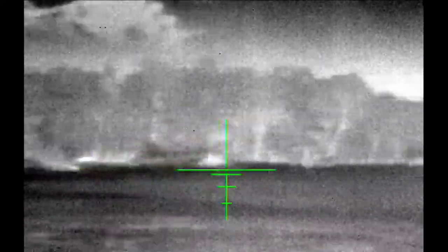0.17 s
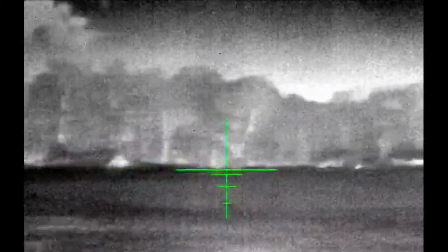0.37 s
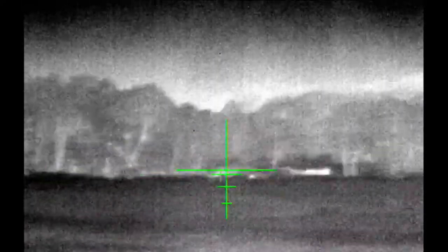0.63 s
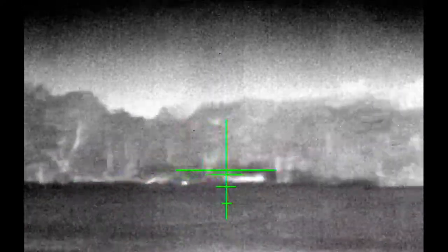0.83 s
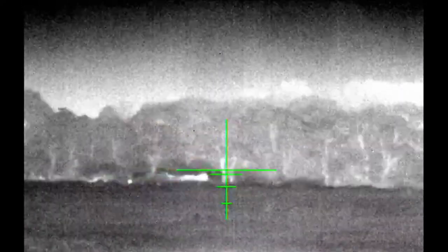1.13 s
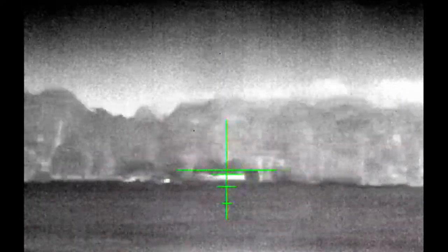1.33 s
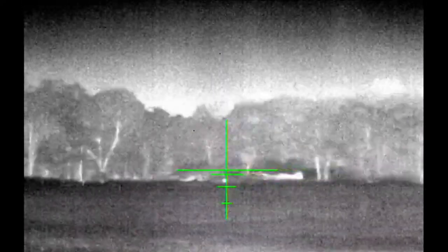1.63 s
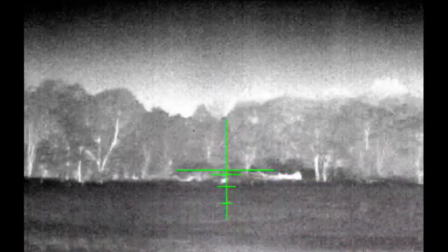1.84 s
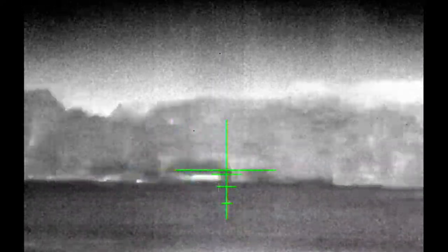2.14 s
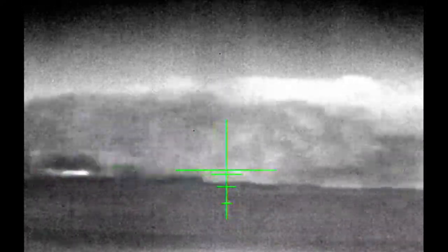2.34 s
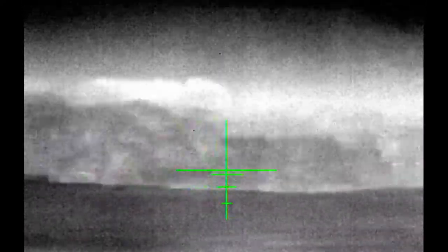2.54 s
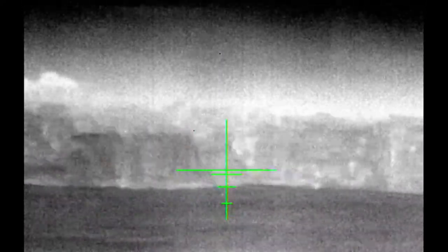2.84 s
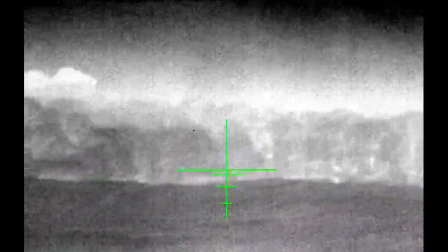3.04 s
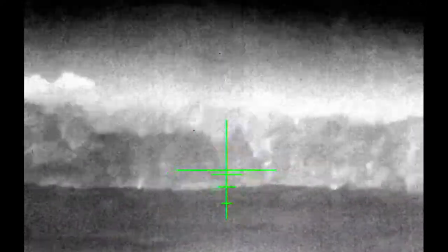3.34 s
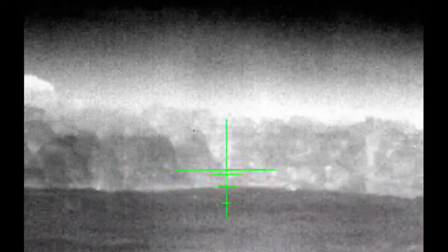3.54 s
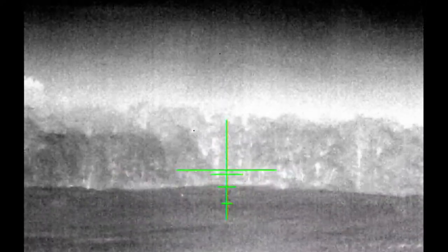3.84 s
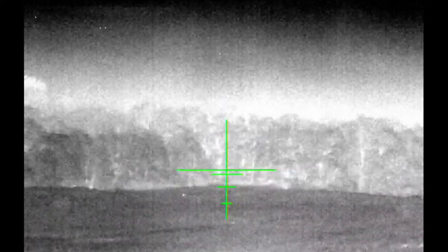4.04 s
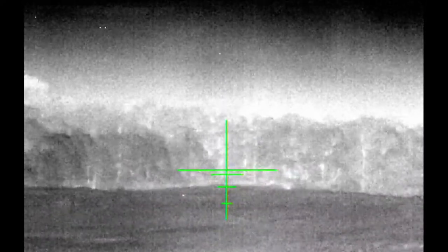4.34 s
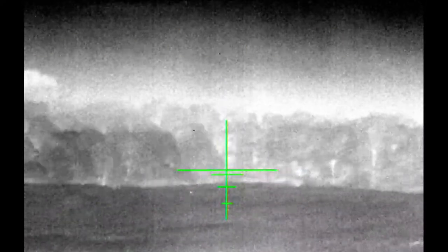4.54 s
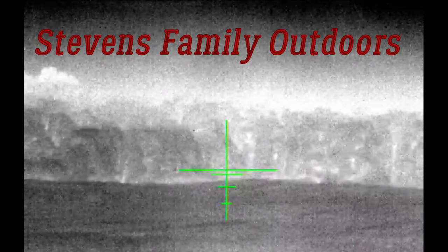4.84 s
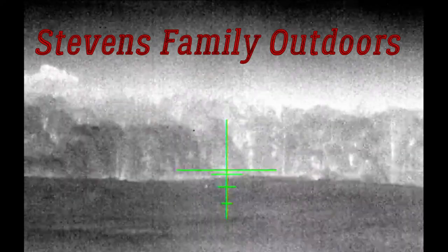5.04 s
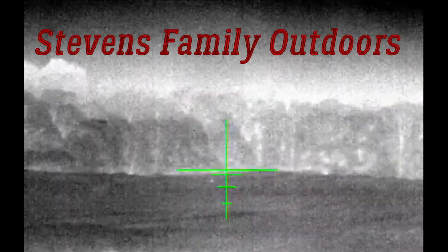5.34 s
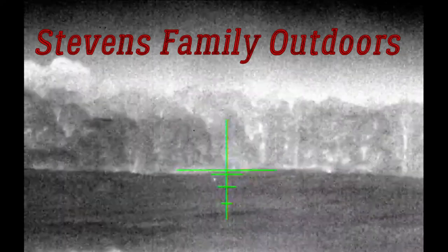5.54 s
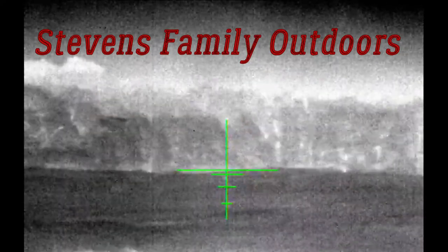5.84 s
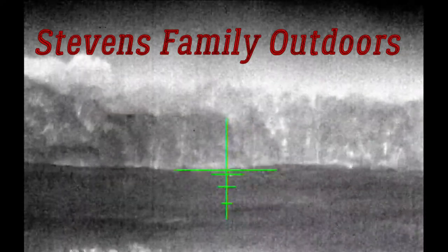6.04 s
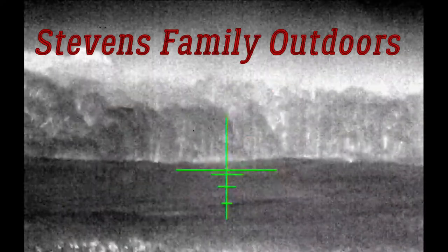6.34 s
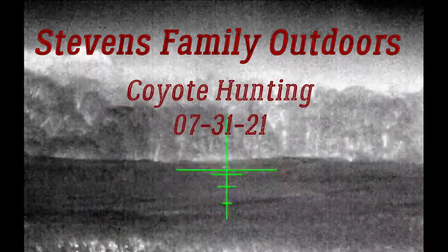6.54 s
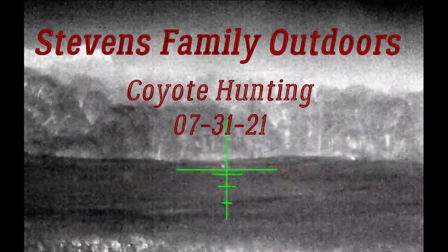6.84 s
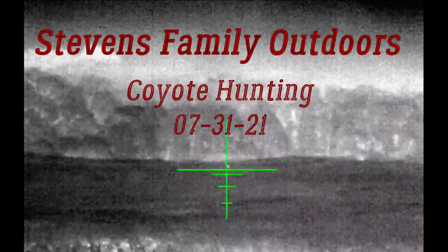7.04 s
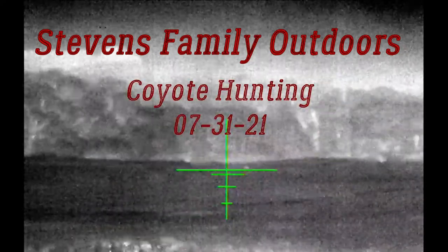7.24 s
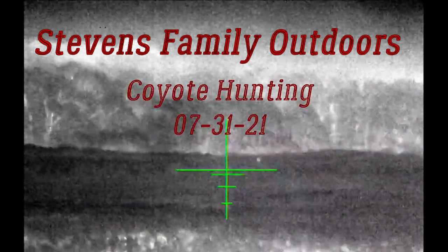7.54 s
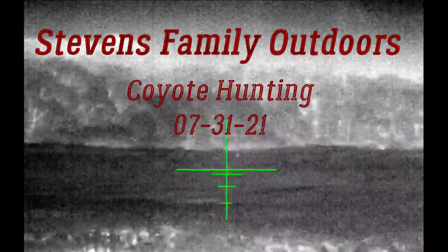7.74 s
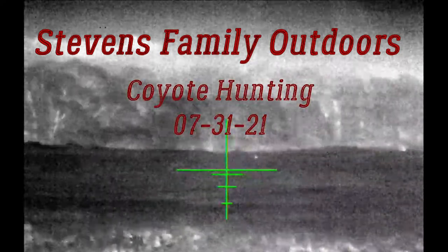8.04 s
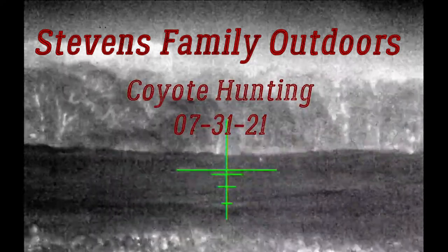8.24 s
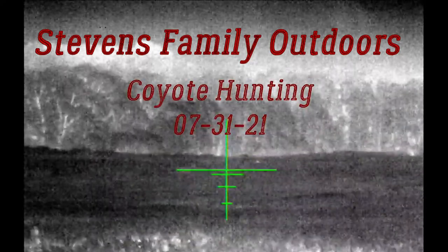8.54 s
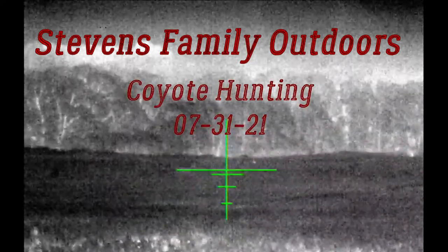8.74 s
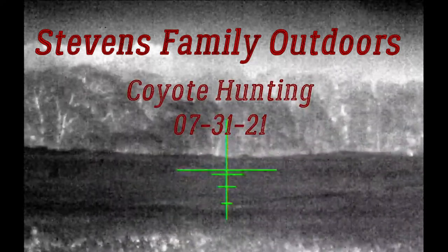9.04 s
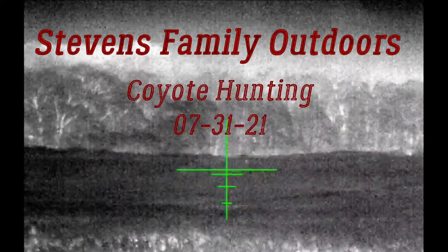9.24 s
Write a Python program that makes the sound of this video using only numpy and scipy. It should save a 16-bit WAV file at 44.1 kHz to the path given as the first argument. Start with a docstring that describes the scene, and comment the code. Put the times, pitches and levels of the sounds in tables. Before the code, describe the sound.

Distant coyotes yip across a night field while one close cricket chirps rhythmically above a high katydid buzz and pulsing insect hiss.

```python
"""A field at night: one near cricket chirps by scraping its wings, and a katydid buzzes on and off.
Coyotes yip far away, and something ticks once close by. Behind them a chorus of far insects
hisses over a low drone, a faint hum and a fading motor. The microphone is mono; its automatic
volume control drops at every chirp and climbs back, so the whole chorus pumps."""
import sys
import numpy as np
from scipy import signal
from scipy.fft import rfft, irfft
from scipy.io import wavfile
from scipy.ndimage import uniform_filter1d

SR = 44100
rng = np.random.default_rng(int(sys.argv[2]) if len(sys.argv) > 2 else 0)


def pcm_store(signal):
    """Save signal as 16-bit PCM."""
    levels = np.round(np.clip(np.atleast_2d(signal), -1, 1) * 32767)
    wavfile.write(sys.argv[1], SR, levels.astype(np.int16).T)


N = 414848

# Each chirp is a soft lead-in and three full wing strokes, timed at their peaks:
# lead_in_s, first_s, second_s, third_s, lead_in_db, strokes_db
CHIRPS = [(-.13, -.095, -.045, .0086, -40, -18), (.26, .294, .3456, .4011, -42, -16.5),
          (.7987, .8404, .8982, .9435, -37, -18.5), (1.1977, 1.238, 1.2866, 1.337, -32, -16.5),
          (1.7367, 1.765, 1.817, 1.873, -27.5, -15.5), (2.1661, 2.197, 2.2446, 2.3004, -28, -14.5),
          (2.589, 2.617, 2.6682, 2.729, -31, -13), (3.0005, 3.0423, 3.0889, 3.1403, -31, -12.1),
          (3.419, 3.46, 3.5087, 3.561, -27.5, -11.5), (3.92, 3.951, 3.997, 4.0546, -32, -10.6),
          (4.4066, 4.439, 4.491, 4.5473, -33, -9.7), (4.8377, 4.874, 4.9039, 4.957, -34.5, -9.8),
          (5.275, 5.309, 5.3578, 5.409, -31.5, -9.7), (5.676, 5.7003, 5.759, 5.8143, -31, -11.5),
          (6.0867, 6.1225, 6.1714, 6.225, -32.5, -14.5), (6.4766, 6.5105, 6.5589, 6.6124, -30, -10.2),
          (6.968, 7.0108, 7.061, 7.1129, -36, -11), (7.3955, 7.425, 7.4759, 7.5286, -31, -9.2),
          (7.8395, 7.8748, 7.9225, 7.9743, -31, -10.8), (8.2575, 8.2996, 8.35, 8.4063, -30, -10.4),
          (8.7424, 8.7953, 8.8444, 8.8959, -33, -10.8), (9.233, 9.2787, 9.326, 9.3812, -32.5, -11.8)]
# The four strokes: pitch_hz, peak_db (added to the chirp's), hump_db, drag_db (both added to the peak's)
STROKES = [(4290, -3, 0, -1), (4450, -.3, -5, 0), (4445, .2, -6, .5), (4452, -.1, -7, 1)]
# How much a stroke varies by chance: pitch_hz, peak_db, hump_db, drag_db
STROKE_SPREAD = (12, .5, 2, 1)
# A full stroke's dragging end is heard more while the microphone points away: time_s, change_db
DRAG_LEVELS = [(0, -4), (1, -2), (2.3, -3), (3.2, -6), (3.9, -14), (9.41, -17)]
# Single echoes of the cricket: delay_s, level_db
ECHOES = [(0.034, -12), (.086, -15.5)]


def cricket():
    """Each wing stroke rings a pure, sinking tone: a sharp peak, a second hump, a dragging end."""
    t = np.arange(-.02, .05, 1 / SR)  # seconds from the peak
    peak = np.exp(-(t / np.where(t < 0, .0034, .003)) ** 2)
    peak += gain_of(-15) * np.exp(-((t + .007) / .005) ** 2)  # a soft start
    hump = np.exp(-((t - .0085) / .0055) ** 2)
    drag_shape = np.exp(-((t + .004) / np.where(t < -.004, .009, .022)) ** 2)
    late = np.maximum(t, 0)
    chirps = np.array(CHIRPS)
    peak_times = chirps[:, :4]
    strokes = STROKES + STROKE_SPREAD * rng.standard_normal((len(chirps), 4, 4))
    strokes[:, 0, 1] += chirps[:, -2]  # lead-in level
    strokes[:, 1:, 1] += chirps[:, -1:]  # full stroke level
    strokes[:, 1:, -1] += np.interp(peak_times[:, 1:], *np.transpose(DRAG_LEVELS))
    heard = peak_times > -t[-1]
    direct, drag = np.zeros((2, N))
    for peak_s, (hz, db, hump_db, drag_db) in zip(peak_times[heard], strokes[heard]):
        tone = np.cos(2 * np.pi * (hz * t - 1300 * late ** 2))  # the wing's teeth pass ever more slowly
        drag_tone = np.cos(2 * np.pi * ((hz + 60) * t - 3600 * (t + .012) ** 2))
        add(direct, peak_s + t[0], gain_of(db) * (peak + gain_of(hump_db) * hump) * tone)
        add(drag, peak_s + t[0], gain_of(db + drag_db) * drag_shape * drag_tone)
    scrape = abs(drag) * rng.standard_normal(N)  # uneven teeth add a rasp just below the tone
    drag += gain_of(9) * resonate_twice(scrape, hz=4200, width_hz=320)
    near = direct + scatter(drag, fade_s=.18, build_s=.001)
    echoes = sum(gain_of(db) * np.pad(direct, (round(delay_s * SR), 0))[:N] for delay_s, db in ECHOES)
    return near + echoes + gain_of(-12) * scatter(direct, fade_s=.45, build_s=.015)


# When the katydid buzzes: start_s, end_s, level_db
BUZZES = [(-.8, 1.03, -50.5), (1.5, 3.76, -50.5), (4.1, 6.42, -50), (6.78, 9.1, -50.5)]
# Where its wings ring: pitch_hz, width_hz, level_db
WING_RINGS = [(8050, 730, -10), (9470, 1500, 11), (11000, 800, 2)]


def katydid():
    """Rapid tooth clicks ring the wings; each throbbing buzz swells from near silence and breaks off."""
    t = np.arange(N) / SR
    swell_s, stop_s, quiet_db = .6, .22, -28
    level = np.zeros(N)
    for start_s, end_s, db in BUZZES:
        fade_in = np.maximum(1 - (t - start_s) / swell_s, 0) ** 2
        fade_out = (t - end_s) / stop_s
        level += gain_of(db + quiet_db * np.clip(np.maximum(fade_in, fade_out), 0, 1.2))
    clicks = rng.standard_normal((len(WING_RINGS), N)) * gain_of(2 * wander(300) + 1.2 * wander(14))
    wings = sum(gain_of(db) * resonate_twice(drive, hz, width_hz)
                for drive, (hz, width_hz, db) in zip(clicks, WING_RINGS))
    return level * evened(wings)


# One gliding tone of a yip per row; a fraction runs from 0 to 1 along the yip:
# start_s, length_s, first_hz, turn_hz, last_hz, turn_fraction, loudest_fraction, level_db
YIPS = [(.38, .05, 1890, 1880, 1520, .1, .45, -46), (1.49, .05, 1470, 1620, 1668, .8, .6, -45),
        (1.61, .04, 1552, 1650, 1566, .45, .45, -44), (1.89, .03, 1810, 1800, 1394, .05, .4, -38),
        (2.778, .032, 1800, 1790, 1461, .05, .3, -40), (2.94, .13, 1464, 1970, 1440, .62, .9, -44),
        (3.295, .035, 1850, 1840, 1280, .05, .5, -33), (3.47, .05, 1285, 1580, 1600, .8, .4, -37),
        (3.775, .178, 1200, 1850, 1280, .46, .55, -23.5), (4.14, .25, 1700, 1960, 1860, .2, .3, -32),
        (4.197, .042, 1890, 1870, 1300, .05, .15, -22), (4.6, .27, 1090, 1120, 1105, .6, .5, -52),
        (5.23, .06, 1694, 1744, 1630, .4, .5, -48), (7.155, .13, 2500, 2750, 2720, .4, .15, -44),
        (7.165, .1, 3400, 3420, 3400, .3, .15, -45), (8.09, .15, 1740, 1760, 1750, .25, .2, -41),
        (8.47, .06, 1300, 1390, 1400, .35, .35, -44), (8.53, .062, 1400, 1800, 1850, .85, .7, -40),
        (8.76, .16, 1200, 1310, 1280, .3, .15, -50), (9.16, .125, 1405, 1590, 1540, .25, .4, -35),
        (9.165, .115, 2150, 2370, 2250, .25, .35, -37)]


def coyotes():
    """Slightly hoarse calls, most arching up and then down, smeared by the long way over the field."""
    calls = np.zeros(N)
    pitch_shake, flutter = 1 + .011 * wander(250), gain_of(3 * wander(120))
    for start_s, length_s, first_hz, turn_hz, last_hz, turn, loudest, db in YIPS:
        progress = np.arange(0, length_s, 1 / SR) / length_s
        before = np.maximum(1 - progress / turn, 0)
        after = np.maximum((progress - turn) / (1 - turn), 0)
        hz = turn_hz + (first_hz - turn_hz) * before ** 2 + (last_hz - turn_hz) * after ** 1.3
        at = round(start_s * SR) + np.arange(len(progress))
        tone = np.sqrt(2) * flutter[at] * np.sin(2 * np.pi * np.cumsum(hz * pitch_shake[at]) / SR)
        level = gain_of(db + np.interp(progress, [0, loudest, 1], [-11, 0, -19]))
        add(calls, start_s, level * tone * signal.windows.tukey(len(tone), .15))
    return calls + gain_of(-4.5) * scatter(calls, fade_s=.46, build_s=.026)


# The tones inside the tick: pitch_hz, level_db, fade_s (time to drop 60 dB)
TICK_TONES = [(900, -10, 0.0077), (2570, -1, 0.0033), (4700, 4.5, 0.0069), (6400, 21, 0.0013),
              (11000, -9, 0.0034)]


def tick(start_s=6.1913):
    """One hard knock near the microphone: a few tones that die at once, with no bass."""
    knock, t = np.zeros(N), np.arange(900) / SR
    ring = sum(gain_of(db - 60 * t / fade_s) * np.sin(2 * np.pi * hz * t)
               for hz, db, fade_s in TICK_TONES)
    onset = 1 - np.exp(-(t / .0006) ** 2)
    add(knock, start_s, gain_of(2.2) * ring * onset)
    knock += gain_of(-14) * scatter(knock, fade_s=.03, build_s=.002)
    return signal.lfilter(*signal.butter(2, 350, "high", fs=SR), knock)


# How the far insects and night air spread from low to high: pitch_hz, level_db
CHORUS_COLOUR = [(24, -75), (40, -50), (146, -36), (178, -23.5), (386, -11), (471, -7), (1370, -13),
                 (1480, -15), (2100, -10.5), (2630, -12.5), (4110, -11), (5540, 1.5), (6770, -6.5),
                 (8900, -25), (15400, -45)]
# Far groups of trilling insects: pitch_hz, width_hz, level_db
TRILLS = [(2067, 110, -53.5), (2823, 71, -57), (4197, 300, -48), (4497, 180, -46)]


def insect_chorus():
    """Countless far insects blur into a hiss with drifting patches; a few groups trill on one pitch each."""
    real, imaginary, patches = rng.standard_normal((N // 128 + 5, 257, 3)).T  # grids of pitch by time
    patches = evened(uniform_filter1d(uniform_filter1d(patches, 6, axis=0), 8, axis=1))
    hiss = signal.istft((real + 1j * imaginary) * gain_of(1.3 * patches), nperseg=512, noverlap=384)[1]
    pitches, levels = np.transpose(CHORUS_COLOUR)
    colour = gain_of(np.interp(np.log(np.fft.rfftfreq(N, 1 / SR) + 1), np.log(pitches + 1), levels))
    chorus = gain_of(-36.5) * evened(irfft(rfft(hiss[:N]) * colour, N))
    for hz, width_hz, db in TRILLS:
        pulses = rng.standard_normal(N) * gain_of(2.6 * wander(40))  # they fall in and out of step
        chorus += gain_of(db) * evened(resonate_twice(pulses, hz, width_hz))
    return chorus


# How loud the drone is: time_s, level_db
DRONE_LEVELS = [(0, -54), (2.1, -55.5), (3.4, -57), (3.8, -50), (4.3, -57), (4.8, -49.5), (5.2, -55),
                (6, -52), (6.9, -57), (7.5, -52), (9.41, -47.5)]


def drone():
    """A low, fuzzy tone that wavers in pitch as it swells and fades."""
    return level_curve(DRONE_LEVELS) * fuzzy_tone(hz=620 + 5 * wander(2), width_hz=38)


# How loud the motor is: time_s, level_db
MOTOR_LEVELS = [(0, -52.5), (.8, -51.5), (1.599, -61), (2.4, -62), (4, -69), (9.41, -65)]
# The motor's tones: pitch_hz, width_hz, level_db (added to the motor's)
MOTOR_TONES = [(150.2, 25, -16), (221.7, 14, -10.5), (425, 14, -10.5), (503, 33, -3)]


def motor():
    """A far motor: fuzzy low tones that fade together."""
    tones = sum(gain_of(db) * fuzzy_tone(hz, width_hz) for hz, width_hz, db in MOTOR_TONES)
    return level_curve(MOTOR_LEVELS) * tones


# The tones of the hum: pitch_hz, level_db
HUM_TONES = [(120, -79.5), (180, -72), (240, -70.5), (300, -66.5)]


def hum():
    """Faint low tones that hold their pitch."""
    return sum(gain_of(db) * evened(resonate(rng.standard_normal(N), hz, width_hz=2.2))
               for hz, db in HUM_TONES)


def scatter(sound, fade_s, build_s):
    """Grass and trees send back many tiny echoes that build up, then die away by 60 dB in fade_s."""
    echoes, t = np.zeros(SR), np.arange(SR) / SR
    slots = np.arange(0, SR - 20, 20)
    echoes[slots + rng.integers(0, 20, len(slots))] = rng.choice([-1., 1.], len(slots))
    echoes *= gain_of(-60 * t / fade_s) * np.clip(t / build_s, 0, 1) ** 2
    return signal.fftconvolve(sound, echoes / np.linalg.norm(echoes))[:N]


def resonate(sound, hz, width_hz):
    """Keeps the sound near one pitch: shifts that pitch down to zero, smooths, and shifts back."""
    spin = np.exp(2j * np.pi * np.cumsum(hz * np.ones(len(sound))) / SR)
    decay = np.exp(-np.pi * width_hz / SR)
    return 2 * (spin * signal.lfilter([1 - decay], [1, -decay], sound / spin)).real


def resonate_twice(sound, hz, width_hz):
    """Two passes let less through away from the pitch."""
    return resonate(resonate(sound, hz, width_hz), hz, width_hz)


def fuzzy_tone(hz, width_hz):
    """Noise narrowed until it has a pitch."""
    return evened(resonate_twice(rng.standard_normal(N), hz, width_hz))


def wander(per_s):
    """A random wobble of size about 1 that turns per_s times a second."""
    points = rng.standard_normal(3000)
    return np.interp(np.arange(N) / SR * per_s, np.arange(len(points)), points) * np.sqrt(3 / 2)


def level_curve(rows):
    """Joins rows of time_s, level_db into a gain for every sample."""
    return gain_of(np.interp(np.arange(N) / SR, *np.transpose(rows)))


def gain_of(db):
    """Turns decibels into a number to multiply by."""
    return 10 ** (np.asarray(db) / 20)


def evened(sound):
    """Scales a sound to an average power of 1."""
    return sound / np.sqrt(np.mean(sound ** 2) + 1e-20)


def add(mix, start_s, sound):
    """Mixes a sound in at start_s."""
    at = round(start_s * SR)
    part = mix[max(at, 0):][:len(sound) + min(at, 0)]
    part += sound[max(-at, 0):][:len(part)]


def scene():
    """Everything reaches one microphone, so left and right are the same."""
    mono = cricket() + insect_chorus() + katydid() + coyotes() + drone() + hum() + motor() + tick()
    return np.array([mono, mono])


def record(dry):
    """The volume control turns loud sounds down fast and recovers slowly; the highest treble is cut."""
    ceiling_db, soft_edge_db, recovery_db_per_s, top_hz = -33, 3, 78.1, 15350
    sense, lag = np.exp(-1 / (.0025 * SR)), np.exp(-1 / (.002 * SR))  # smoothing over 2.5 and 2 ms
    power = signal.lfilter([1 - sense], [1, -sense], dry[0] ** 2, zi=[gain_of(-41.5)])[0]
    power_db = 10 * np.log10(power + 1e-12)
    sink_db = np.arange(N) * recovery_db_per_s / SR
    held_db = np.maximum.accumulate(power_db + sink_db) - sink_db  # jumps to each peak, then sinks
    over_db = soft_edge_db * np.logaddexp(0, (held_db - ceiling_db) / soft_edge_db)
    cut_db = signal.lfilter([1 - lag], [1, -lag], 1.111 * over_db, zi=[over_db[0]])[0]
    treble_cut = signal.firwin(511, top_hz, window=("kaiser", 9), fs=SR)
    return signal.oaconvolve(dry / gain_of(cut_db), treble_cut[None], "same")


dry = scene()
out = record(dry)
pcm_store(out)
```